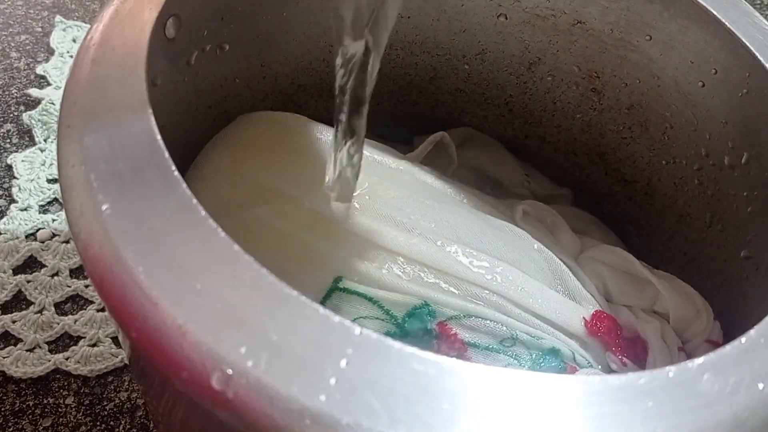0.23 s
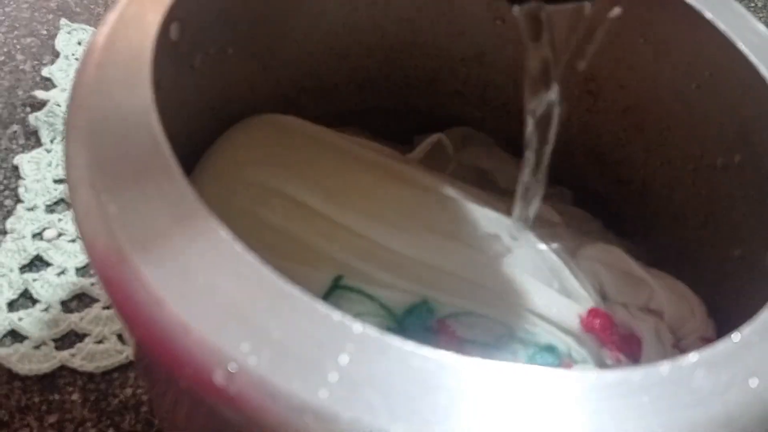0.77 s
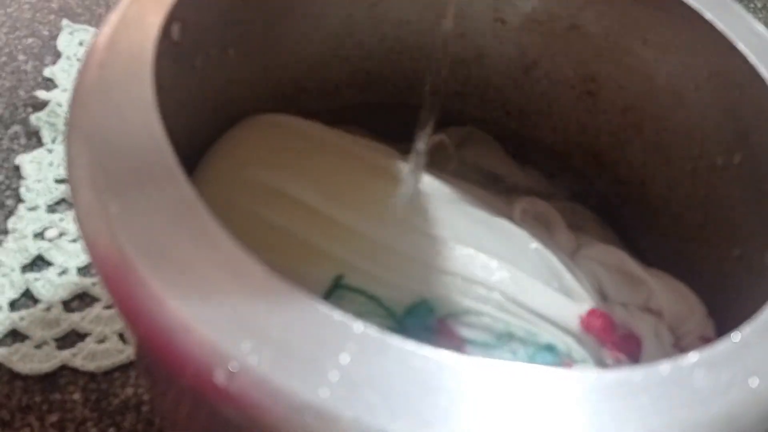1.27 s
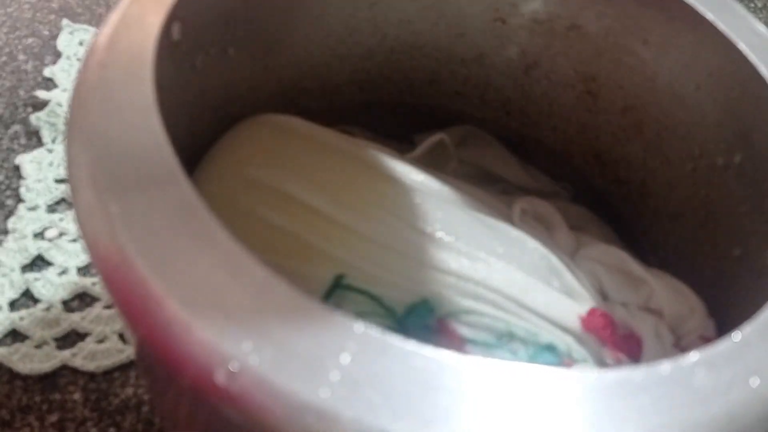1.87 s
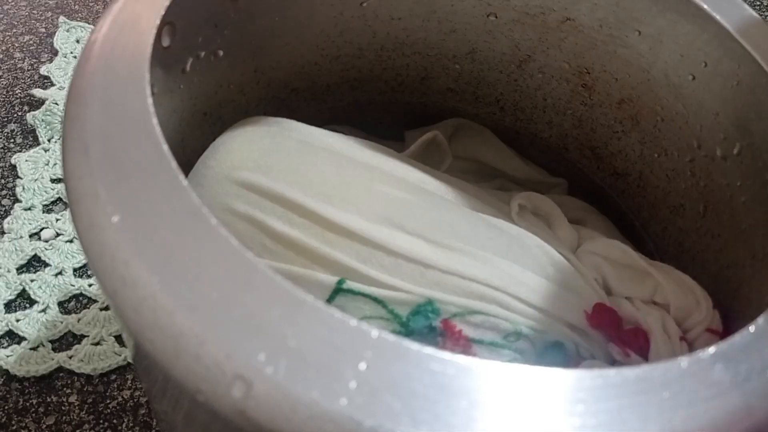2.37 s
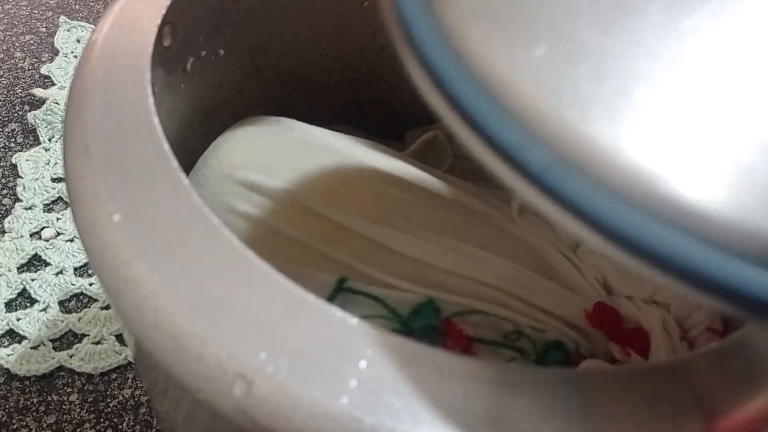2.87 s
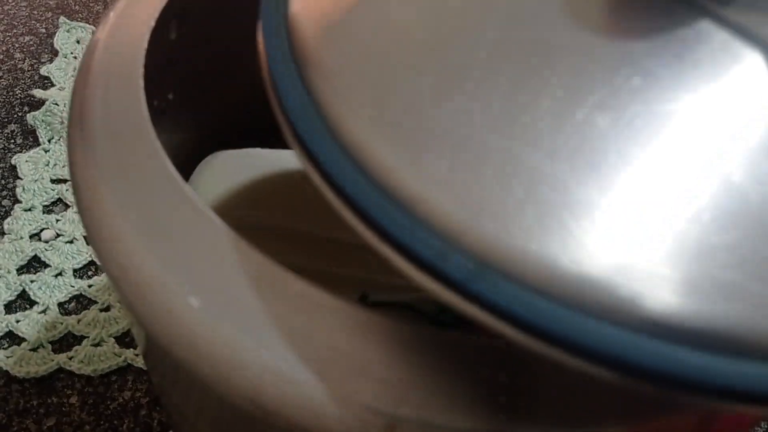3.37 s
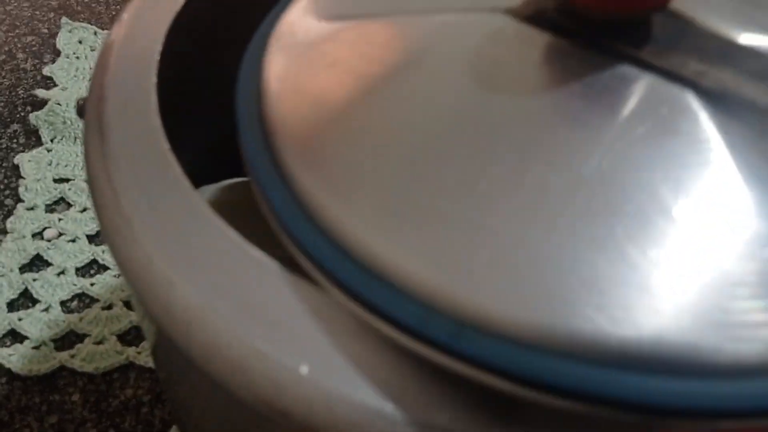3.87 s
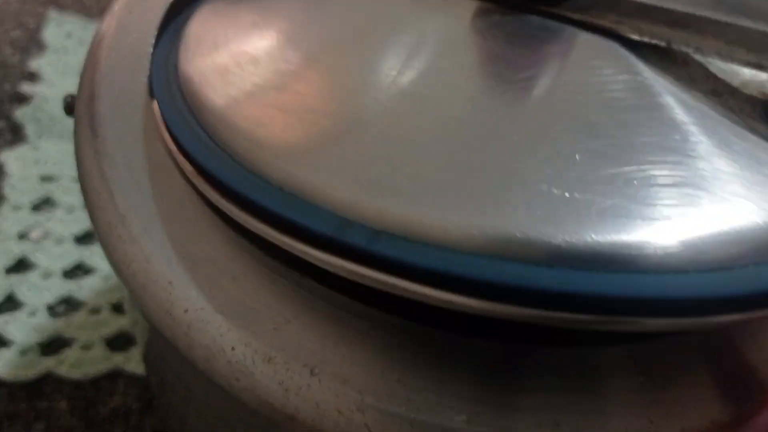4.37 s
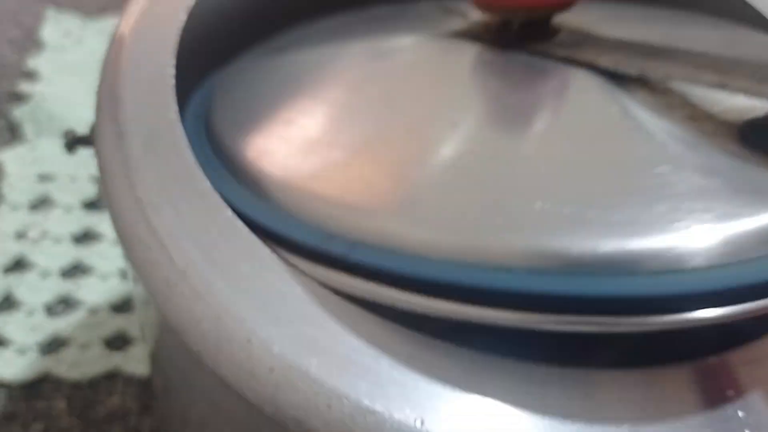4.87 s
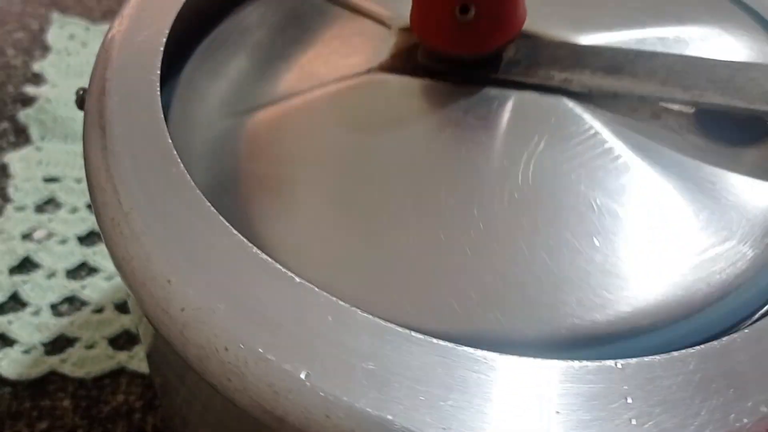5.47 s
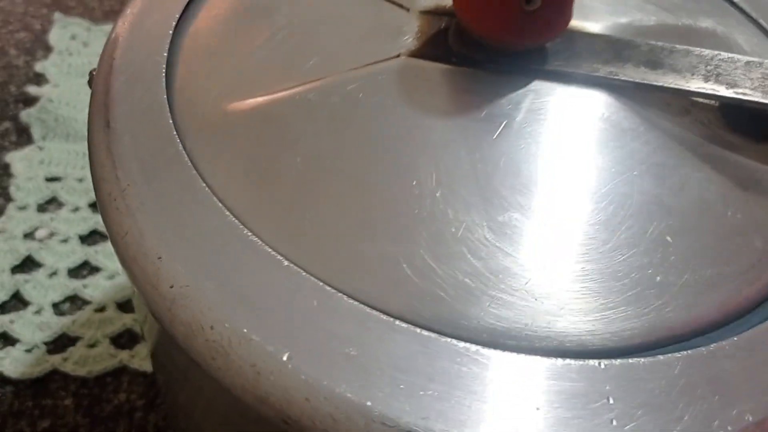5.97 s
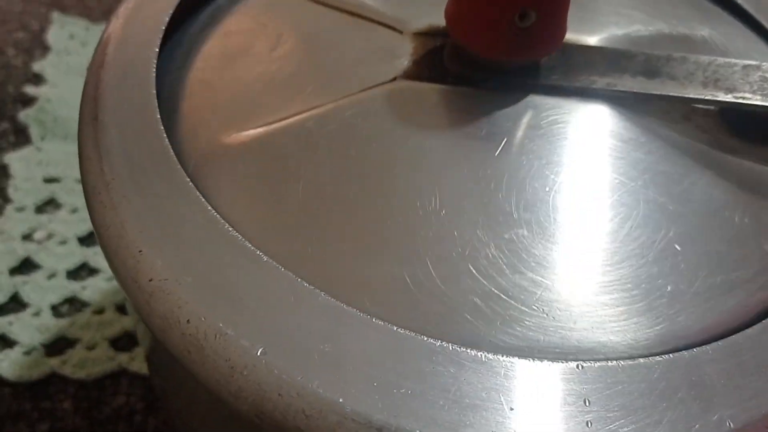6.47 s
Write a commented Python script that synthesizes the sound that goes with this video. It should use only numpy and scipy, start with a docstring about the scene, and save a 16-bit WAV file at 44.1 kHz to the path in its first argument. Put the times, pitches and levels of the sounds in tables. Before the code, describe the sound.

From the start, water splashes lightly onto wet cloth in a thick metal pot, with fine spray, bright drips and a small gurgle near 1 second. It trickles out by about 1.5 seconds, while an engine outside throbs and grows louder. At 2.1 seconds the sound drops out abruptly, then fades back by 2.8 without the engine, leaving quiet kitchen air and an appliance's faint hum and thin whine. A metal lid touches the pot softly at 3 seconds, then knocks and scrapes from 3.6, with loud clanks around 3.9 and 4.2. From 4.7 to 5.4 it grinds and rattles into the opening with quick knocks and short rings. One sharp clack comes at 5.7 seconds, followed by light clicks and faint rubbing as it settles, until about 6.7. Water and lid sound close, with a short kitchen echo.

```python
"""Water splashes onto wet cloth in a thick metal pot; an engine throbs outside, an appliance hums and whines.
The sound drops out and fades back in without the engine; the lid knocks, scrapes into the pot and settles.
The water is ringing bubbles over spray. Engine and appliance are wavering sines over shaped noise.
Knocks and rubbing drive the same modes of lid and pot. Water, lid and bumps echo in the kitchen."""
import sys
import numpy as np
from scipy import signal
from scipy.fft import rfft, irfft, next_fast_len
from scipy.io import wavfile

SR = 44100
rng = np.random.default_rng(int(sys.argv[2]) if len(sys.argv) > 2 else 0)


def to_wav(s):
    """Save 16-bit WAV."""
    ch = np.atleast_2d(s).T  # columns
    pcm = np.round(np.clip(ch, -1, 1) * 32767)  # PCM
    wavfile.write(sys.argv[1], SR, pcm.astype(np.int16))


N = 295911

# Each row: time in seconds, splash level (below 4 kHz) in dB, spray level (above) in dB.
STREAM_LEVELS = [(0.0, -57.5, -50), (0.085, -66.5, -63.5), (0.154, -56, -57.5), (0.2, -67, -72),
                 (0.285, -83.5, -65), (0.32, -60.5, -56.5), (0.42, -61, -60), (0.515, -63, -55.5),
                 (0.54, -52, -49.5), (0.62, -54.5, -54.5), (0.7, -61.5, -62), (0.77, -61.5, -58.5),
                 (0.91, -61, -64.5), (0.95, -68, -58), (1.06, -57.5, -59.5), (1.14, -60, -62.5),
                 (1.18, -69, -73.5), (1.33, -72, -70.5), (1.45, -82.5, -58), (1.7, -100, -100)]
# Each row: frequency in Hz, relative level in dB.
SPRAY_SPECTRUM = [(590, -21.5), (1000, -34.5), (1250, -45), (1450, -13.5), (1650, -13.5), (2560, -7),
                  (4070, -4), (5130, 1), (7190, 6), (13000, -31.5), (15100, -3), (16000, -32)]
# Each row: time in seconds, pitch in Hz, level in dB.
GURGLE_PATH = [(.78, 1487, -100), (.84, 1540, -63), (.925, 1400, -56.5), (.945, 1267, -61),
               (.965, 1072, -47), (.99, 1450, -56), (1.05, 1474, -52), (1.115, 1479, -58),
               (1.132, 1380, -54), (1.17, 1480, -100)]
# Each row: start in seconds, bubble level in dB, pitch in Hz, snap level in dB.
DROPS = [(0.026, -49, 2600, -60), (.087, -44, 5200, -56), (.111, -45.5, 815, -79), (0.11, -40, 2400, -51.5),
         (0.124, -35.5, 4280, -48), (0.151, -37.5, 2450, -45), (.238, -35, 5570, -46.5),
         (0.337, -38, 7290, -43), (0.3576, -45, 5800, -48.5), (0.381, -46, 8360, -51),
         (0.3987, -30.5, 4220, -66.5), (.412, -33.5, 4820, -75), (.4324, -37, 5600, -65),
         (0.433, -46, 1720, -75.5), (0.4743, -40.5, 2530, -76), (.4832, -33.5, 5700, -71),
         (.509, -40, 5270, -67), (0.525, -39.5, 5300, -38.5), (0.53, -41.5, 450, -77.5),
         (0.536, -21.5, 5070, -35), (.548, -34, 5230, -58), (.555, -46, 3640, -75.5),
         (0.564, -36, 8500, -49), (0.583, -38, 1780, -75), (0.601, -39, 2010, -72), (0.611, -38, 5030, -45),
         (.628, -46, 2600, -70), (.648, -42, 3270, -70), (0.6636, -39, 4850, -50.5),
         (0.694, -38.5, 4330, -43), (0.7188, -35, 5560, -40.5), (0.73, -39.5, 3850, -77),
         (.813, -56, 6190, -42.5), (.838, -37, 5430, -62), (.853, -35.5, 6160, -54.5),
         (0.879, -39.5, 2510, -60.5), (0.945, -29.5, 5800, -39), (0.949, -33, 6000, -59.5),
         (.958, -39.5, 3460, -75.5), (0.972, -33.5, 6750, -40.5), (.984, -39, 5500, -59),
         (.995, -41, 3100, -69), (0.992, -38.5, 1440, -42), (1.014, -42, 2420, -39),
         (1.021, -35.5, 8700, -55), (1.027, -39.5, 2480, -68), (1.038, -40, 2450, -70),
         (1.05, -39, 2100, -70), (1.056, -34, 2790, -56), (1.0576, -30, 6630, -39), (1.071, -37, 6000, -60),
         (1.134, -39, 3150, -69), (1.119, -40.5, 3660, -72), (1.132, -36.5, 1470, -49),
         (1.2131, -29, 7380, -45), (1.3561, -30.5, 5820, -38.5), (1.396, -37, 5370, -37.5),
         (1.4333, -30, 4950, -37.5)]
# Each row: multiple of the firing rate, relative level in dB.
ENGINE_ORDERS = [(1, 7.5), (2, -26), (3, -31.5), (4, -14), (5, -15), (6, -10.5), (7, -33)]
# Each row: centre in seconds, depth in dB.
ENGINE_DIPS = [(.25, 2.7), (.57, 9), (1.4, 5)]
# Each row: centre in seconds, engine order, lift in dB, half-width in seconds.
ORDER_SWELLS = [(1.71, 5, 15, .13), (1.745, 6, 17.5, .05), (1.978, 4, 18, 0.12), (2.108, 6, 10.5, .04)]
# Each row: frequency in Hz, relative level in dB.
ROAD_SPECTRUM = [(65, -33), (110, -8), (191, -4), (337, -6), (394, -2.5), (529, -2), (935, -3),
                 (1050, -7.5), (3420, -12), (4680, -25.5), (6160, -15), (8260, -32.5), (12000, -63),
                 (15600, -84), (22000, -120)]
HUM_LINES = [(188.4, -70.5), (473.7, -87), (532.9, -82.5)]
WHINE_LINES = [(6013, -76.5), (6132, -78.5), (6191, -80.5), (6304, -85)]
AIR_SPECTRUM = [(15, -53.5), (25, -24), (134, -13), (190, -18.5), (326, -18), (476, -19.5), (659, -21),
                (818, -31), (1020, -32.5), (1890, -31), (5280, -39), (6210, -34), (7110, -38.5),
                (9840, -57.5), (16000, -64)]
# Each row: time in seconds, level in dB.
HUM_LEVEL = [(0, -70.5), (2.1, -62), (2.4, -52)]
WHINE_LEVEL = [(0, -64.5), (1.25, -63), (2.0, -67.5), (2.9, -62.5), (3.05, -58.5), (3.14, -56), (3.3, -63),
               (4.1, -60), (4.4, -57), (4.9, -55), (5.35, -55.5), (6.4, -54), (6.71, -53.5)]
AIR_LEVEL = [(0, -66.5), (2.6, -61), (3.15, -58), (3.5, -56.5), (5.9, -55), (6.3, -60.5), (6.71, -62.5)]
# Each row: frequency in Hz, reverberation time in seconds.
KITCHEN_T60 = [(150, 0.64), (500, 0.59), (2000, 0.41), (6000, 0.45), (12000, 0.021)]
# Each row: start in seconds, level in dB.
TICKS = [(.205, -49), (.44, -62), (.527, -52), (.806, -47), (.925, -51), (1.003, -45), (1.0835, -45),
         (1.147, -42), (1.433, -57), (4.859, -41), (4.985, -50), (4.991, -33)]
# Each row: start in seconds, peak in dB, pitch in Hz, length in seconds.
RINGS_AND_BUMPS = [(2.952, -61, 2370, 0.11), (3.041, -50, 695, 0.049), (3.043, -53, 1072, 0.13),
                   (3.092, -57.5, 2320, 0.07), (4.678, -32, 363, 0.031), (4.696, -25.5, 345, 0.063),
                   (4.726, -40, 2380, 0.016), (4.737, -25.5, 310, 0.039), (4.939, -24.5, 1880, 0.01),
                   (4.942, -32, 2830, 0.015), (5.269, -38.5, 2380, 0.081), (5.33, -34.5, 287.8, 0.18),
                   (5.334, -45, 2424, 0.21), (5.379, -28, 2390, .016), (5.674, -31, 127, 0.016),
                   (5.670, -10.5, 2050, 0.013), (5.67, -29, 283, 0.021), (5.918, -35, 856, 0.019),
                   (5.919, -37, 2830, 0.012), (5.922, -34, 4650, 0.0076), (6.086, -38.5, 1200, 0.015),
                   (6.09, -39, 639, 0.064), (6.091, -30.5, 193, 0.06), (6.259, -40, 2637, 0.017),
                   (6.271, -45, 2480, 0.023), (6.267, -44, 853, 0.019), (6.454, -46, 911, 0.041),
                   (6.455, -35.5, 3680, 0.024), (6.557, -47.5, 630, 0.048), (6.615, -30.5, 874, 0.015),
                   (6.617, -41, 2440, 0.013), (6.68, -60, 930, 0.014)]
# Modes of lid and pot, except the last row, a thin hiss band near 15 kHz.
# Each row: frequency in Hz, width in Hz, relative level in dB.
RESONANCES = [(263, 14, -5), (284, 22, 4), (313, 60, -3), (346, 18, 1), (390, 19, -2.5), (458, 30, -2.5),
              (505, 26, -10), (562, 13, -3.5), (630, 13, -1), (681, 27, -1), (773, 22, 2), (877, 20, 1.5),
              (920, 25, -5.5), (993, 23, -3.5), (1077, 27, -3.5), (1200, 57, -5), (1362, 20, -7.5),
              (1440, 21, -5.5), (1674, 25, -3), (1840, 19, -6), (1996, 27, -9.5), (2166, 29, -4.5),
              (2380, 32, 0), (2620, 19, -7.5), (2830, 43, 1), (2980, 33, 1), (3410, 62, 3), (3936, 57, 3),
              (4484, 60, -1.5), (5000, 47, -1.5), (5540, 31, -4), (6270, 58, -2), (6660, 51, -2.5),
              (7380, 56, -2), (8240, 59, -5), (9280, 53, -7), (10750, 60, -8.5), (15200, 1200, -36.5)]
# Each row: start in seconds, thud, body and top levels in dB, low and high favoured pitch in Hz.
KNOCKS = [(3.035, -53, -43, -76, 690, 1730), (3.565, -31.5, -32.5, -30, 346, 3140),
          (3.6, -38, -55.5, -61, 336, 2400), (3.65, -26.5, -29, -20.5, 346, 907),
          (3.82, -47, -58.5, -40, 253, 3380), (3.831, -59, -60.5, -43, 460, 4050),
          (3.843, -41.5, -51, -46, 470, 2820), (3.857, -68, -46, -38, 880, 2970),
          (3.927, -20.5, -15, -18, 363, 1470), (3.935, -16.5, -16, -8, 370, 6180),
          (3.944, -23.5, -19, -25.5, 1362, 2980), (4.032, -25.5, -61.5, -35, 358, 1780),
          (4.064, -25.5, -25.5, -30, 313, 1780), (4.159, -10, -14, -10.5, 309, 1480),
          (4.211, -31.5, -18, -22, 292, 1800), (4.221, -21, -13.5, -19.5, 284, 1200),
          (4.704, -29, -34.5, -56, 362, 2380), (4.736, -42, -40.5, -49, 877, 2400),
          (4.861, -52, -33, -50, 1400, 10750), (4.876, -24, -26, -37, 471, 2380),
          (4.895, -37, -26.5, -43, 471, 5500), (4.914, -30, -23.5, -30, 475, 4000),
          (4.942, -19, -20, -30, 850, 2820), (4.954, -21, -27.5, -37, 877, 1820),
          (4.972, -29, -30.5, -42, 773, 2440), (4.987, -40, -22, -29, 810, 2400),
          (5.001, -41, -29, -40, 773, 5000), (5.04, -22.5, -21.5, -35, 358, 1840),
          (5.055, -35, -24, -31, 358, 1940), (5.066, -26, -18.5, -53, 390, 1600),
          (5.08, -23.5, -20, -40, 390, 1660), (5.119, -28.5, -30.5, -36.5, 368, 2430),
          (5.155, -31.5, -22, -63, 355, 1640), (5.179, -27, -23.5, -37, 335, 2400),
          (5.316, -35, -66, -62, 298, 6270), (5.346, -61.5, -41, -41, 296, 6270),
          (5.359, -54, -45, -38, 270, 6270), (5.386, -43.5, -56.5, -38, 280, 2570),
          (5.6703, -24.5, -23, -18.5, 600, 2870), (5.689, -53, -39, -35, 877, 4600),
          (5.701, -42, -53, -30.5, 283, 2620), (5.92, -68.5, -50, -36, 877, 2830),
          (6.086, -68, -41, -73, 650, 1770), (6.154, -69, -53, -70, 668, 1200),
          (6.263, -75, -64, -49.5, 843, 2510), (6.272, -76.5, -59, -47, 877, 2620),
          (6.458, -95.5, -54, -36.5, 877, 6400), (6.616, -79, -46.5, -53, 880, 2270),
          (6.674, -55, -47.5, -56, 855, 5950)]
# Three strokes of lid on rim. Each row of a stroke: time in seconds, pressure in dB, brightness in dB.
RUB_STROKES = [
    [(3.62, -85, 1), (3.74, -56.5, 7), (3.8, -57.5, 15), (3.86, -54, 12.5), (3.88, -62.5, 7),
     (3.92, -59, -5), (3.99, -54, 22), (4.04, -36.5, -1), (4.1, -39, -2), (4.17, -62, 15.5), (4.33, -49, 9),
     (4.5, -59, -12)],
    [(4.655, -66, 0), (4.68, -46.5, 5.5), (4.8, -44.5, 0), (4.86, -38, 4), (4.988, -30.5, 2.5),
     (5.056, -32, 3), (5.15, -34, -6.5), (5.23, -42.5, -2), (5.3, -44.5, 9.5), (5.424, -42.5, -7),
     (5.5, -75.5, -3)],
    [(5.66, -100, 5), (5.69, -50.5, 4), (5.8, -78, -6), (5.95, -74, 12), (6.08, -75, 9.5), (6.13, -64.5, 0),
     (6.22, -77, -0.5), (6.55, -78, -5), (6.6, -71.5, -1.5), (6.71, -67, 5.5)],
]
# Edges in Hz of the four registers: thud, body, clank, tick.
REGISTER_EDGES_HZ = [230, 500, 1600, 4200, 16000]
# Each row, one per register: offset from the pressure in dB, share of the brightness.
RUB_RESPONSE = [(0.5, 0.13), (-0.66, 0.12), (-12.5, 0.83), (-14, 1)]
# Per register: factor on mode width when hand-damped, ringing free, rubbed.
DAMPED_WIDTH = [2.2, 2.6, 3.6, 4.0]
FREE_WIDTH = [1.1, 1.1, 1.1, 1.3]
RUBBED_WIDTH = [1.1, 1.3, 1.5, 2.1]
# Per register: relative level in dB of the free ringing, of the raw scratch.
FREE_DB = [-13, -17, -19, -23]
SCRATCH_DB = [-9, -4, -3, -3]
# Colour of snaps and lid. Each row: frequency in Hz, gain in dB.
SHARP_EQ = [(20, 6), (7000, 6.5), (10000, -6), (12800, -20.5), (14300, -21), (15300, -6.5)]
# Each row: time in seconds, gain in dB.
DROPOUT_GAIN = [(2.131, -4.5), (2.134, -74), (2.32, -54), (2.36, -23.5), (2.6, -11), (2.8, -13)]

TIME_S = np.arange(N) / SR


def from_db(db):
    return np.exp(np.asarray(db) * np.log(10) / 20)


def unit_rms(x):
    return x / np.sqrt(np.mean(x ** 2) + 1e-20)


def curves(rows):
    """One per-sample curve for each column after the time."""
    times_s, *columns = np.transpose(rows)
    return [np.interp(TIME_S, times_s, column) for column in columns]


def at_hz(rows, hz):
    points_hz, values = np.transpose(rows)
    return np.interp(np.log(hz), np.log(points_hz), values)


def colour(x, spectrum):
    size = next_fast_len(len(x))
    gain = from_db(at_hz(spectrum, np.fft.rfftfreq(size, 1 / SR) + 1))
    return irfft(rfft(x, size) * gain, size)[:len(x)]


def butter(x, order, hz, kind):
    return signal.sosfilt(signal.butter(order, hz, kind, fs=SR, output="sos"), x)


def decay(clicks, tau_s):
    return signal.lfilter([1], [1, -np.exp(-1 / (tau_s * SR))], clicks + 1e-18)


def drift(rate_hz):
    """Slow random curve, rms 1."""
    r = np.exp(-80 * np.pi * rate_hz / SR)
    slow = signal.lfilter([1], [1, -2 * r, r * r], rng.standard_normal(N // 40 + 2002))[2000:]
    return np.interp(np.arange(N) / 40, np.arange(len(slow)), unit_rms(slow))


def ring(clicks, hz, width_hz):
    """Resonator: a unit click starts a dying sine of height 1."""
    r, w = np.exp(-np.pi * width_hz / SR), 2 * np.pi * hz / SR
    return signal.lfilter([0, np.sin(w)], [1, -2 * r * np.cos(w), r * r], clicks + 1e-18)


def grains(per_s, spread_db):
    """Random clicks of uneven size and sign."""
    sizes = from_db(spread_db * np.minimum(rng.exponential(1, N), 4)) * rng.choice([-1, 1], N)
    return sizes * (rng.random(N) < per_s / SR)


def tones(lines, waver_db, rate_hz):
    """Sines wavering in level, total rms 1."""
    return unit_rms(sum(
        from_db(db + waver_db * drift(rate_hz)) * np.sin(2 * np.pi * (hz * TIME_S + rng.random()))
        for hz, db in lines))


def water():
    """Clumps of small bubbles ring over fine spray and excite the pot; a fold of the cloth gurgles."""
    splash_db, spray_db = curves(STREAM_LEVELS)
    births = grains(per_s=4500 * from_db(4.5 * drift(30)), spread_db=3.5)
    pitch_index = rng.integers(0, 24, N)
    bands = np.zeros((2, N))
    for k, hz in enumerate(np.geomspace(1300, 11000, 24)):
        gain = from_db(at_hz(SPRAY_SPECTRUM, hz) + 5 * drift(14))
        bands[int(hz > 4000)] += gain * ring(births * (pitch_index == k), hz, hz / 16)
    bubbles = from_db(splash_db) * unit_rms(bands[0]) + from_db(spray_db) * unit_rms(bands[1])
    fizz = unit_rms(colour(grains(per_s=11000, spread_db=-2), SPRAY_SPECTRUM))
    fizz *= from_db(spray_db - 7 + 8.7 * drift(32))
    gurgle_hz, gurgle_db = curves(GURGLE_PATH)
    turns = np.cumsum(gurgle_hz * (1 + 0.06 * drift(70))) / SR  # trapped air changes size
    gurgle = from_db(gurgle_db + 5.5 * drift(60)) * np.sin(2 * np.pi * turns)
    pot_air = unit_rms(ring(births, hz=840, width_hz=66)) * from_db(0.27 * splash_db - 46)
    pot_wall = unit_rms(ring(births, hz=2600, width_hz=90)) * from_db(splash_db - 9)
    return bubbles + fizz + gurgle + pot_air + pot_wall


def engine():
    """Firing tone and overtones over tyre noise and rumble; comes nearer, speeds up once."""
    firing_hz = np.interp(TIME_S, [0.88, 1.08], [62.5, 65.7])
    turns = np.cumsum(firing_hz) / SR
    dip_db = sum(db * np.exp(-((TIME_S - s) / 0.028) ** 2) for s, db in ENGINE_DIPS)
    tone_db = -68 + 7.5 * TIME_S - dip_db
    tone = np.zeros(N)
    for order, db in ENGINE_ORDERS:
        swell_db = sum(lift_db * np.exp(-((TIME_S - s) / half_s) ** 2)
                       for s, swelling, lift_db, half_s in ORDER_SWELLS if swelling == order)
        waver_db = (0.6 if order == 1 else 4) * drift(14)
        tone += from_db(db + swell_db + waver_db) * np.sin(2 * np.pi * (order * turns + rng.random()))
    road = unit_rms(colour(rng.standard_normal(N), ROAD_SPECTRUM))
    road_db = -68.5 + 10 * TIME_S + 0.57 * drift(19)
    running = TIME_S < 2.2  # ends inside the dropout
    return running * (from_db(tone_db) * tone + from_db(road_db) * road)


def appliance():
    """Motor hum and a thin whine of close lines."""
    hum = from_db(curves(HUM_LEVEL)[0]) * tones(HUM_LINES, waver_db=3, rate_hz=7)
    whine = from_db(curves(WHINE_LEVEL)[0]) * tones(WHINE_LINES, waver_db=3.5, rate_hz=15)
    return hum + whine


def kitchen_air():
    """Quiet room noise."""
    level_db = curves(AIR_LEVEL)[0] + 0.51 * drift(12)
    return from_db(level_db) * unit_rms(colour(rng.standard_normal(N), AIR_SPECTRUM))


def low_drone(noise, pressure_db):
    """A faint steady 189 Hz drone that swells during the rubbing."""
    drone = ring(np.diff(noise, prepend=0), hz=189.3, width_hz=14)
    return from_db(0.35 * pressure_db - 33.5) * unit_rms(drone)


def kitchen_echo(x):
    """Reflections: a noise tail that dies away band by band."""
    t, tail = np.arange(SR // 2) / SR, 0
    edges_hz = 100 * 2 ** np.arange(0, 7.4, 0.5)
    for low_hz, high_hz in zip(edges_hz, edges_hz[1:]):
        band = butter(rng.standard_normal(len(t)), 2, [low_hz, high_hz], "band")
        tail += band * from_db(-60 * t / at_hz(KITCHEN_T60, np.sqrt(low_hz * high_hz)))
    tail *= np.minimum(t / 0.0078, 1)
    return signal.fftconvolve(x, tail / np.sqrt(np.sum(tail ** 2)))[:N]


def drops():
    """A drop snaps on landing; its bubble rings, rising in pitch as it nears the surface."""
    size = 4000
    t = np.arange(size) / SR
    bubbles, snaps = np.zeros((2, N + size))
    for start_s, db, hz, snap_db in DROPS:
        start = round(start_s * SR)
        t60_s = 0.025 * (2980 / hz) ** 0.57
        envelope = from_db(db - 60 * t / t60_s) * np.minimum(t / 0.00066, 1)
        bubbles[start:][:size] += envelope * np.sin(2 * np.pi * hz * (1.009 * t + 0.95 * t * t))
        snaps[start:][:size] += from_db(snap_db) * rng.standard_normal(size) * np.exp(-t / 0.0058)
    return bubbles[:N] + colour(butter(snaps[:N], 4, 4300, "high"), SHARP_EQ)


def ticks():
    """Tiny noise bursts in the top treble."""
    clicks = np.zeros(N)
    for start_s, db in TICKS:
        clicks[round(start_s * SR)] = from_db(db)
    return butter(decay(clicks, tau_s=0.003) * rng.standard_normal(N), 4, 11000, "high")


def rings_and_bumps():
    """Short pitched rings of lid and pot, mostly at knocks, plus a few soft bumps and squeaks."""
    out, shake_s = np.zeros(N), 0.00008 * drift(170)
    for start_s, db, hz, length_s in RINGS_AND_BUMPS:
        start = round(start_s * SR)
        t = np.arange(min(round(3 * length_s * SR), N - start)) / SR
        span = slice(start, start + len(t))
        swell = 4 * t / length_s * np.exp(1 - 4 * t / length_s)
        turns = hz * (t + shake_s[span]) + rng.random()
        out[span] += from_db(db) * swell * np.sin(2 * np.pi * turns)
    return out * from_db(2 * drift(60))


def lid():
    """Knocks and rubbing drive the same modes; each struck spot favours those near two pitches."""
    contact_s, favour_db = 0.0012, 10
    knocks, modes = np.array(KNOCKS), np.array(RESONANCES)
    starts, spot_hz = np.round(knocks[:, 0] * SR).astype(int), knocks[:, 4:]
    thud_db, body_db, top_db = knocks[:, 1:4].T
    first, second, third = RUB_STROKES
    pressure_db, brightness_db = curves([(3.55, -110, 0.013), *first, *second, (5.6, -110, 0), *third])
    grind = grains(per_s=1800 * from_db(5 * drift(45)), spread_db=3.5)
    noise = rng.standard_normal(N)
    metal = np.zeros(N)
    for k, knock_db in enumerate([thud_db, body_db, top_db, top_db]):
        low_hz, high_hz = REGISTER_EDGES_HZ[k:k + 2]
        band_hz = [low_hz / 1.7, high_hz * 1.31]
        register = modes[(modes[:, 0] >= low_hz) & (modes[:, 0] < high_hz)]
        total_db = 10 * np.log10(np.sum(from_db(2 * register[:, 2])))
        cracks, struck, rubbed = np.zeros((3, N))
        for hz, width_hz, db in register:
            lift_db = favour_db * np.exp(-(np.log(hz / spot_hz) / 0.13) ** 2).max(axis=1)
            lag = (rng.random(len(starts)) * contact_s * SR).astype(int)  # the contact rolls
            uneven = from_db(rng.normal(0, 2, len(starts))) * rng.choice([-1, 1], len(starts))
            clicks = np.zeros(N)
            clicks[starts + lag] = uneven * from_db(knock_db + db - total_db + lift_db)
            struck += ring(clicks, hz, DAMPED_WIDTH[k] * width_hz)
            struck += from_db(FREE_DB[k]) * ring(clicks, hz, FREE_WIDTH[k] * width_hz)
            drive = grind * np.roll(noise, round(hz))  # own grain strengths per mode
            rubbed += from_db(db + 3 * drift(4.8)) * ring(drive, hz, RUBBED_WIDTH[k] * width_hz)
        cracks[starts] = from_db(knock_db - 12.5)
        struck += decay(cracks, tau_s=0.011) * unit_rms(butter(noise, 2, band_hz, "band"))
        scratch = from_db(SCRATCH_DB[k]) * unit_rms(butter(grind, 2, band_hz, "band"))
        offset_db, share = RUB_RESPONSE[k]
        rub_db = pressure_db + offset_db + share * brightness_db
        metal += butter(struck + from_db(rub_db) * (unit_rms(rubbed) + scratch), 2, band_hz, "band")
    # Thin hiss near 15 kHz that rises with the loudest scraping.
    top_hiss = from_db(pressure_db - 13) * unit_rms(butter(grind, 4, 13500, "high"))
    radiated = butter(metal + top_hiss, 6, 225, "high")  # too small to radiate deep bass
    return radiated + table_thump(starts, thud_db) + low_drone(noise, pressure_db)


def table_thump(starts, thud_db):
    """Each knock shoves the pot against the table."""
    pushes = np.zeros(N)
    pushes[starts] = from_db(thud_db - 25.5)
    return ring(pushes, hz=106, width_hz=36)


def scene():
    pour, metal, rings = water() + drops(), colour(lid(), SHARP_EQ), rings_and_bumps()
    echo = kitchen_echo(from_db(-13) * pour + from_db(-9.5) * metal + from_db(-17) * rings)
    return (pour + metal + rings + echo + engine() + appliance() + kitchen_air() + ticks())[None]


def record(dry):
    """Brief dropout, fade back to a lower gain, steep treble cut."""
    cutoff_hz = 16200
    heard = dry * from_db(curves(DROPOUT_GAIN)[0])
    return signal.sosfilt(signal.cheby2(20, 70, cutoff_hz, fs=SR, output="sos"), heard)


dry = scene()
out = record(dry)
to_wav(out)
```